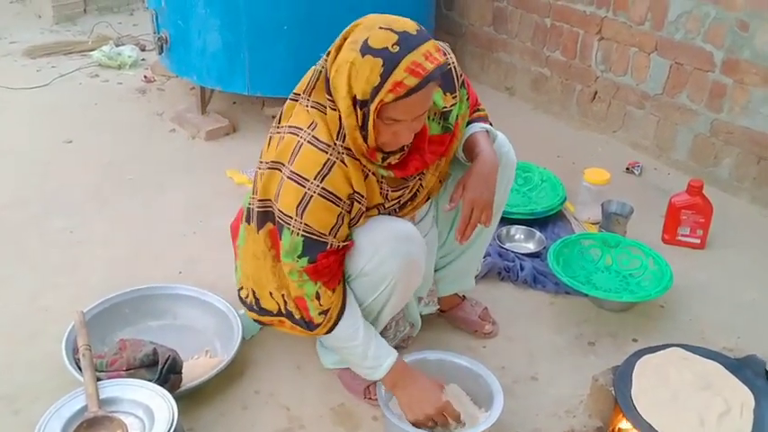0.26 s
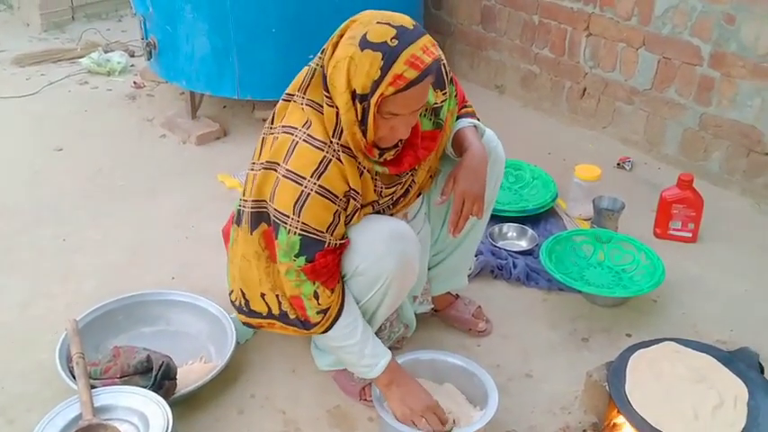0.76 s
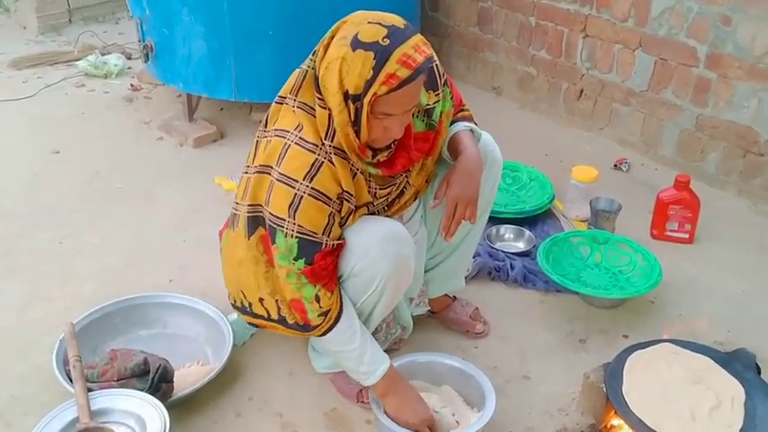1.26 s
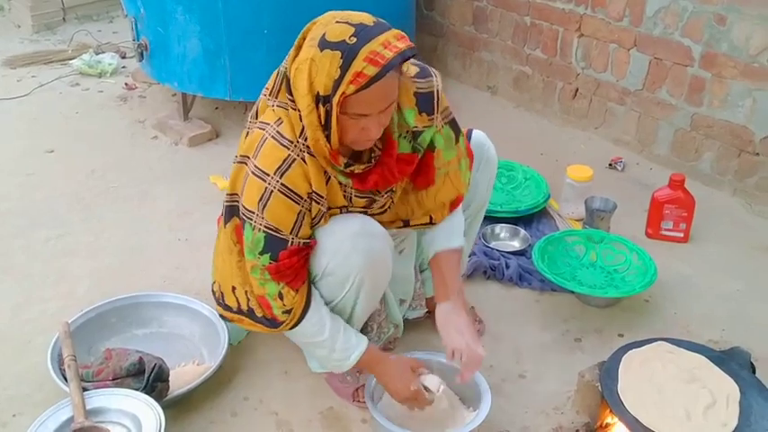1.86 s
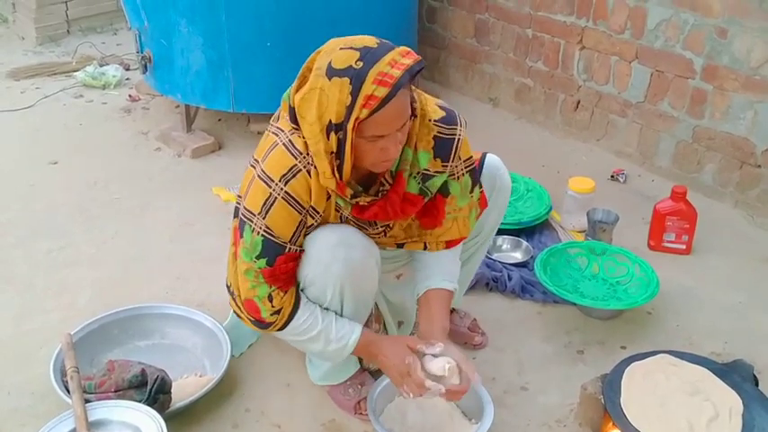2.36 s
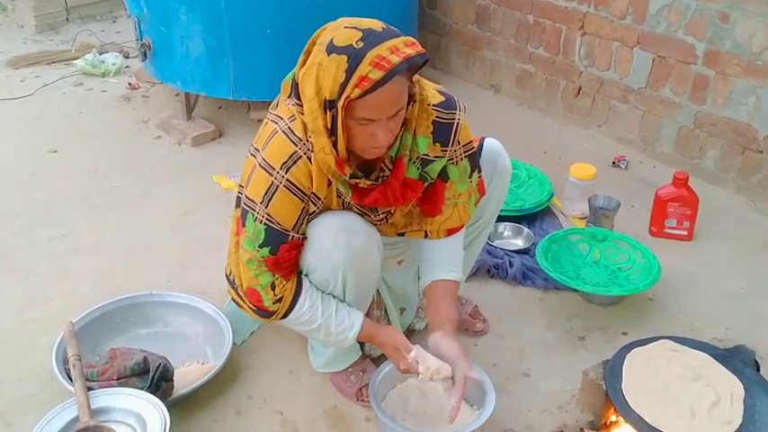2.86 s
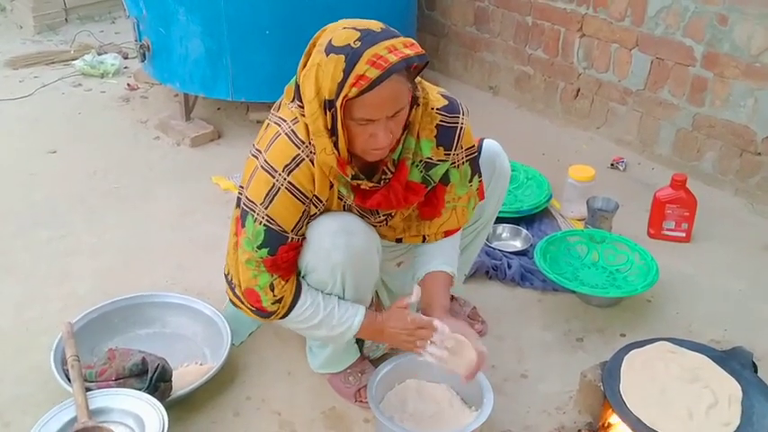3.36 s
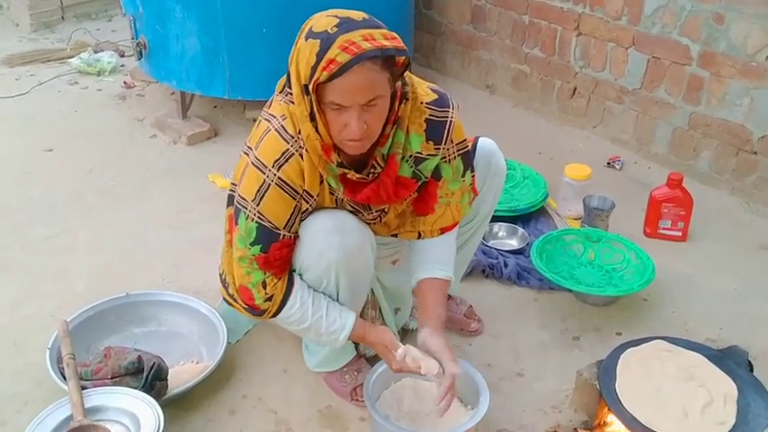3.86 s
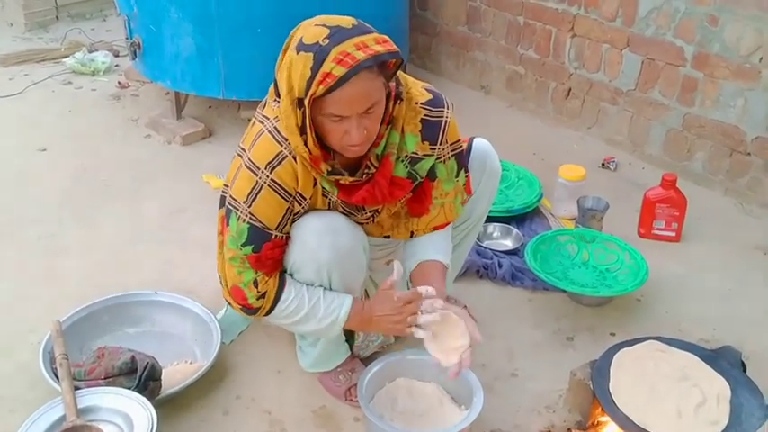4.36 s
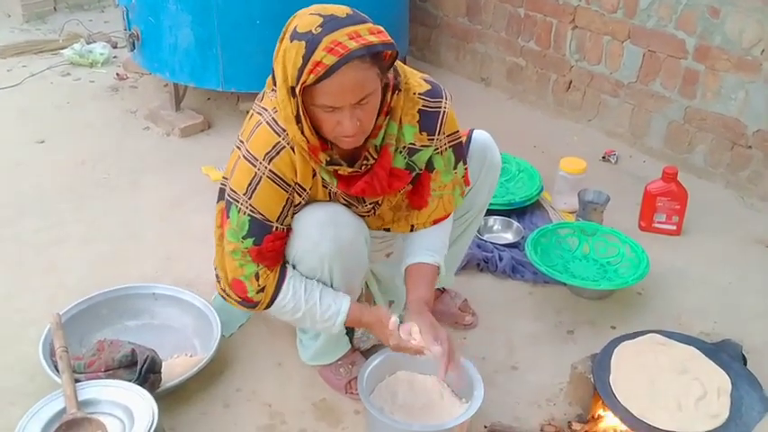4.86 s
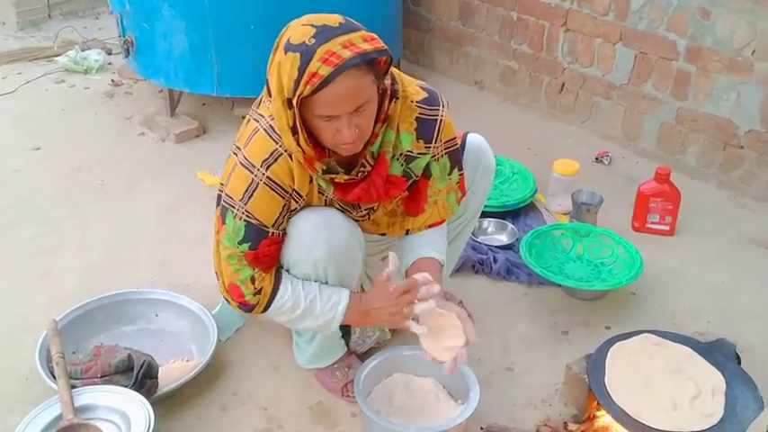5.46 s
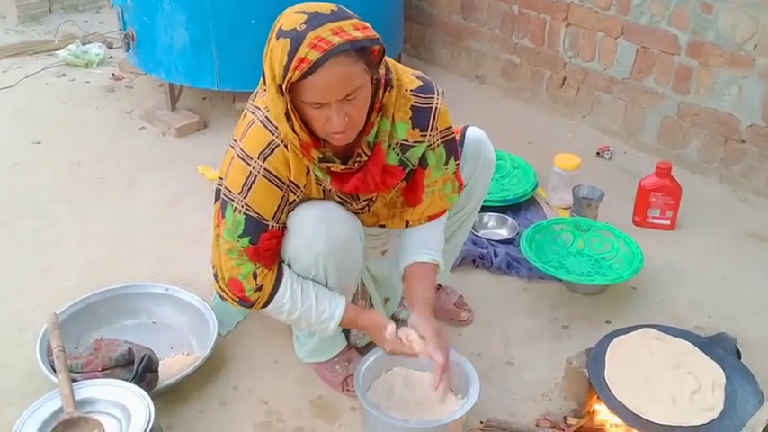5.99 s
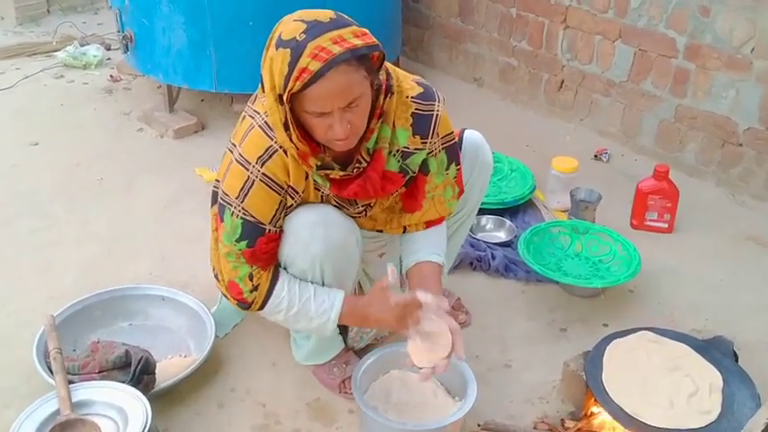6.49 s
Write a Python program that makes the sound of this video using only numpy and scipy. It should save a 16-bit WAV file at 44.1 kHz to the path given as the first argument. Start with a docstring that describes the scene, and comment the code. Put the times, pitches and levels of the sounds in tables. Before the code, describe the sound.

A wood fire snaps close by, with slow palm slaps on dough, one sharp pop and a distant cawing crow.

```python
"""A wood fire snaps close by as a crow caws five times beyond a brick-walled village yard.
The caw is a syrinx tone shaken by a rattle. Dough slapped between two hands rings the cupped air.
Splitting fibres make the snaps; one sharp fire pop sets the microphone ringing low.
A small bird whistles upward, bangles tinkle and far birds pipe over a low background hum.
Walls echo; a phone microphone colours it all."""
import sys
import numpy as np
from scipy import signal
from scipy.fft import rfft, irfft
from scipy.io import wavfile
from scipy.ndimage import uniform_filter1d

SR = 44100
rng = np.random.default_rng(int(sys.argv[2]) if len(sys.argv) > 2 else 0)


def transcribe(signal):
    """Save signal, clipped to [-1, 1], as a 16-bit WAV file at the path in sys.argv[1]."""
    frames = np.atleast_2d(signal).T
    limited = np.clip(frames, -1, 1)
    pcm = np.round(limited * 32767).astype(np.int16)
    wavfile.write(sys.argv[1], SR, pcm)


N = 296793
SHORT_S, LONG_S = np.arange(1024) / SR, np.arange(4096) / SR  # time axes of brief sounds


def caw(length_s, level_db, top_hz, crest, rattle_hz, hoarse):
    """Syrinx tone, pitch and strength shaken by a rattle; hoarseness makes both unsteady."""
    # (frequency [ratio to strongest partial], level [dB])
    partials = [(.5, -17), (.75, -15), (1, 0), (1.25, -20), (2.75, -33), (3, -33)]
    ends_db, sag = -16, .13  # level and pitch drop at zero effort
    t = np.arange(0, length_s, 1 / SR)
    effort = np.sin(np.pi * np.interp(t / length_s, [0, crest, 1], [0, .5, 1])) ** .4
    hz = top_hz * (1 - sag * (1 - effort))
    rattle_rad = 2 * np.pi * np.cumsum(rattle_hz * (1 + .15 * hoarse * wobble(len(t), span=500))) / SR
    jitter = .11 * hoarse * wobble(len(t), span=50)
    cycles = np.cumsum(hz * (1 + .06 * np.sin(rattle_rad) + jitter)) / SR
    beats = (1 + .15 * np.cos(rattle_rad - .8)) * amp(3.5 * hoarse * wobble(len(t), span=80))
    voice = sum(amp(db) * np.cos(2 * np.pi * k * cycles) for k, db in partials)
    envelope = amp(level_db + ends_db * (1 - effort)) * signal.windows.tukey(len(t), .05)
    return envelope * unit_rms(voice * beats)


def crow(echo_s):
    """Five caws and their echo off a wall."""
    # (start [s], length [s], level [dB], top of strongest partial [Hz], effort crest [share of length],
    #  rattle [Hz], hoarseness [0-1])
    caws = [(.27, .305, -48.5, 1760, .62, 77, .37), (1.06, .33, -48, 1780, .6, 78, .35),
            (1.855, .26, -48, 1770, .42, 76, .5), (2.24, .27, -49.5, 1780, .55, 75, .37),
            (3.39, .33, -50, 1800, .68, 74, .62)]
    out = np.zeros(N)
    for start_s, *call in caws:
        add(out, start_s, caw(*call))
    add(out, echo_s, amp(-13) * out)
    return out


def slap(cup, thud_db, clap_db, crack_db, smack_db, far_db):
    """Palm push rings the thud, uneven fingers the clap and crack; wet dough smacks; walls answer."""
    # modes (frequency [Hz], level [dB], t60 [s])
    cupped_air = [(190, -6, .035), (315, 0, .027), (410, 1, .022), (580, -9, .012)]
    palm_on_dough = [(760, -1, .015), (990, 0, .018), (1310, -2, .015)]
    fingers_on_dough = [(1350, -2, .012), (1650, 1, .012), (2150, 0, .01), (2550, -10, .008)]
    # ground and near wall (delay [s], level [dB])
    near_echoes = [(.0032, -2), (.0098, -4), (.021, -16), (.032, -18)]
    # houses across the lane (delay [s], level [dB])
    far_echoes = [(.06, 0), (.0695, -1), (.08, -5), (.101, -4), (.127, -9)]
    lead_s = .0015  # fingertips land before the palm
    push = SHORT_S * np.exp(-SHORT_S / .0003)
    fingers = rng.standard_normal(len(SHORT_S)) * push
    tips = rng.standard_normal(len(SHORT_S)) * SHORT_S * np.exp(-SHORT_S / .002)
    thud = struck(push, np.multiply(cupped_air, [cup, 1, 1]), thud_db)
    clap = struck(fingers, palm_on_dough, clap_db)
    crack = struck(tips, fingers_on_dough, crack_db)
    smack = hiss([(2000, -12), (4000, 0), (9000, -4), (15000, -8)], rise_s=.0015, fade_s=.004)
    bright = clap + amp(smack_db) * smack
    dull = filtered(thud + .2 * clap, 600, "low")  # distance and brick keep the bass
    out = np.zeros(SR // 4)
    add(out, 0, crack)
    add(out, lead_s, .45 * thud + bright)
    for delay_s, db in near_echoes:
        add(out, lead_s + delay_s, amp(db) * (thud + .45 * bright + .6 * crack))
    for delay_s, db in far_echoes:
        add(out, lead_s + delay_s, amp(db + far_db) * dull)
    return out


def dough():
    """Dough slapped from palm to palm."""
    # (time [s], cupped-air pitch [ratio], thud [dB], clap [dB], crack [dB], smack [dB], far walls [dB])
    slaps = [(2.0745, .85, -37, -36, -40, -55, -20), (2.9718, .95, -14.5, -24, -22, -43, -23),
             (3.9885, 1.1, -14, -19, -21, -28, -23), (5.06, 1.08, -14, -11, -22, -29, -16),
             (6.1619, 1.05, -7.5, -14, -24, -26, -17), (6.4615, 1, -60, -50, -46, -64, -20)]
    out = np.zeros(N)
    for start_s, *blow in slaps:
        add(out, start_s, slap(*blow))
    return out


def snap(level_db, body_db, edge_db):
    """Noise burst from splitting fibres; the bass lasts longest."""
    # main, two body and edge bands (from [Hz], to [Hz], gain [dB], fade [s])
    bands = [(7000, 11000, -.5, .0015), (300, 2800, 12, .0022), (2800, 6000, 11.5, .0015),
             (12000, 17000, 8.5, .0017)]
    noise = rng.standard_normal(len(SHORT_S)) * (1 - np.exp(-SHORT_S / .0003))
    levels_db = level_db + np.array([0, body_db, body_db, edge_db])
    return sum(peaked(filtered(noise * np.exp(-SHORT_S / fade_s), [low_hz, high_hz], "band"), db + gain_db)
               for db, (low_hz, high_hz, gain_db, fade_s) in zip(levels_db, bands))


def fire():
    """Burning wood: loud snaps, and faint ones after random waits."""
    # (time [s], level at 7-11 kHz [dB], relative body under 6 kHz [dB], relative edge at 14 kHz [dB])
    snaps = [(0.0462, -37, -18, -7), (0.2897, -46, -14, -12), (0.5166, -32, -16, -16),
             (0.9042, -41, -10, -7), (1.025, -49, -19, -12), (1.1462, -28, -9, -16), (1.4819, -38, -9, -9),
             (2.0761, -35, -11, -7), (2.2791, -39, -18, -13), (2.609, -31, -20, -18),
             (2.7281, -39, -20, -9), (2.7625, -38, -17, -8), (2.797, -39, -23, -11), (2.8678, -47, -5, -15),
             (3.1402, -41, -22, -10), (3.2065, -32, -12, -9), (3.2938, -40, -14, -8),
             (3.463, -45, -21, -13), (3.5632, -40, -20, -17), (3.7418, -40, -13, -4),
             (4.2117, -36, -24, -11), (4.292, -35, -11, -10), (4.6557, -42, -23, -15),
             (4.6807, -39, -23, -16), (4.7076, -48, -13, -12), (4.763, -30, -15, -14),
             (4.785, -34, -13, -11), (4.8538, -37, -18, -12), (5.41, -36, -24, -14), (5.658, -40, -20, -13),
             (5.8475, -39, -20, -15), (6.6068, -31, -5, -9)]
    faint_per_s = 2.2
    waits, sizes = rng.exponential(1, (40, 2)).T
    faint = [(s, -55 + 1.8 * size, -13, -10) for s, size in zip(np.cumsum(waits) / faint_per_s, sizes)]
    out = np.zeros(N)
    for start_s, *levels_db in snaps + faint:
        add(out, start_s, snap(*levels_db))
    return out


def fire_pop(start_s=4.5937, level_db=-4, suction_s=.00072, mic_ring_hz=150, mic_ring_t60_s=.03):
    """A sharp close fire pop with a spray of hiss; it sets the microphone ringing low."""
    dip = -np.sin(np.pi * np.clip(LONG_S / suction_s, 0, 1)) ** 2
    t = np.maximum(LONG_S - suction_s, 0)
    mic_ring = amp(-60 * t / mic_ring_t60_s) * np.cos(2 * np.pi * mic_ring_hz * t)
    rise = (1 - np.exp(-t / .00012)) * (.55 * np.exp(-t / .0006) + .45 * mic_ring)
    ripple = .4 * np.exp(-t / .0004) * np.sin(2 * np.pi * 3100 * t)
    spray = amp(-28) * hiss([(1500, -12), (7000, -4), (14000, 0)], rise_s=.002, fade_s=.012)
    out = np.zeros(N)
    add(out, start_s, amp(level_db) * (dip + rise + ripple + spray))
    return out


def small_bird(echo_s, length_s=.125, from_hz=2800, to_hz=5450, loudest_hz=4450):
    """Rising near-sine whistles, each repeated by a wall."""
    # (time [s], direct [dB], echo [dB])
    whistles = [(.576, -70, -67), (1.8, -76, -70), (2.778, -70, -70), (4.158, -70, -73), (5.42, -69, -71),
                (6.322, -69, -75)]
    out, t = np.zeros(N), np.arange(0, length_s, 1 / SR)
    hz = from_hz + (to_hz - from_hz) * (t / length_s) ** .85
    arch_db = -3.8 * ((hz - loudest_hz) / 1000) ** 2
    sweep = np.sin(2 * np.pi * np.cumsum(hz) / SR) * signal.windows.tukey(len(t), .2)
    for start_s, direct_db, echo_db in whistles:
        tone = sweep * amp(arch_db + 2.5 * wobble(len(t), span=150))
        add(out, start_s, amp(direct_db) * tone)
        add(out, start_s + echo_s, amp(echo_db) * tone)
    return out


def bangles(shake_s=1.39, spread_s=.035, shake_db=-55):
    """Single touches ring briefly, sliding down a little; a shaken stack rings its high modes."""
    # clearest touches (time [s], level [dB], ring [Hz])
    tinkles = [(3.7125, -60, 9610), (3.8242, -59, 9190), (4.0866, -58, 9130), (4.1295, -59, 9620),
               (4.3345, -57, 9600), (4.3675, -57, 10000), (4.4628, -58, 9890), (4.5007, -56, 9820),
               (4.5321, -58, 10500), (4.8194, -58, 10500)]
    # (frequency [Hz], level [dB], t60 [s])
    stack_modes = [(13300, -8, .05), (13800, -3, .08), (14450, 0, .03)]
    faint = [(rng.uniform(3.3, 5.05), -62, rng.uniform(9100, 10600)) for _ in range(12)]
    slide_s = LONG_S + .0002 * (1 - np.exp(-LONG_S / .006))
    envelope = amp(-60 * LONG_S / .04) * (1 - np.exp(-LONG_S / .003))
    out = np.zeros(N)
    for start_s, db, hz in tinkles + faint:
        add(out, start_s, amp(db) * envelope * np.sin(2 * np.pi * hz * slide_s))
    stack = ring(stack_modes) * (1 - np.exp(-LONG_S / .001))
    for offset in np.sort(rng.standard_normal(7)):
        jingle = stack * wobble(len(LONG_S), span=40)
        add(out, shake_s + spread_s * offset, amp(shake_db - 3 * offset ** 2) * jingle)
    return out


def far_birds():
    """Pipes and clucks: short wavering notes."""
    # (time [s], length [s], pitch [Hz], level [dB])
    notes = [(.72, .09, 2340, -66), (.875, .12, 2280, -64), (1.298, .014, 1400, -42),
             (1.62, .18, 1500, -64), (2.644, .02, 1560, -56), (2.79, .02, 1560, -56),
             (2.93, .012, 1630, -56), (3.21, .07, 2370, -65), (4.338, .015, 1400, -58),
             (5.69, .1, 1390, -60), (5.82, .06, 1390, -64), (5.95, .08, 1350, -65), (6.1, .06, 780, -62),
             (6.25, .08, 1400, -62), (6.62, .1, 1350, -60)]
    out = np.zeros(N)
    for start_s, length_s, hz, db in notes:
        size = round(length_s * SR)
        cycles = np.cumsum(hz * (1 + .012 * wobble(size, span=120))) / SR
        add(out, start_s, amp(db) * np.sin(2 * np.pi * cycles) * signal.windows.tukey(size, .6))
    return out


def background_hum(rms_db=-55):
    """Steady low hum with faint hiss, band-limited near 15.5 kHz; the spectrum drifts slightly."""
    # hum, hiss and band limit (frequency [Hz], spectral density [dB])
    spectrum = [(25, -32), (45, -27), (100, 1), (170, 3), (270, 0), (420, -5), (650, -13), (900, -12),
                (1800, -12.5), (2600, -17.5), (3300, -24), (4500, -28), (6000, -29), (15400, -28.5),
                (15650, -90)]
    frames, hz = N // 256 + 5, np.fft.rfftfreq(1024, 1 / SR)[:, None]
    real, imag, patches = rng.standard_normal((frames, 513, 3)).T
    patches = unit_rms(uniform_filter1d(uniform_filter1d(patches, 8, 0), 10, 1))
    patch_db = 2.2 * patches / (1 + hz / 3500)
    swell_db = 1.8 * unit_rms(wobble(frames, span=14)) / (1 + hz / 400)
    spectra = (real + 1j * imag) * amp(curve_db(spectrum, hz) + patch_db + swell_db)
    return amp(rms_db) * unit_rms(signal.istft(spectra, nperseg=1024, noverlap=768)[1][:N])


def yard(x, t60_s, delay_s):
    """Wall reverberation: sparse dying reflections of random sign."""
    at = np.arange(1000) * 21 + rng.integers(0, 21, 1000)
    taps = np.zeros(SR)
    taps[at + round(delay_s * SR)] = rng.choice([-1., 1.], 1000) * amp(-60 * at / SR / t60_s)
    return signal.oaconvolve(x, taps / np.linalg.norm(taps))[:N]


def ring(modes):
    """Dying modes (frequency [Hz], level [dB], t60 [s])."""
    return sum(amp(db - 60 * LONG_S / t60_s) * np.sin(2 * np.pi * hz * LONG_S) for hz, db, t60_s in modes)


def struck(blow, modes, peak_db):
    """Modes rung by a blow, low bass cut."""
    rung = signal.oaconvolve(blow, ring(modes))[:len(LONG_S)]
    return peaked(filtered(rung, 200, "high"), peak_db)


def hiss(spectrum, rise_s, fade_s):
    """Noise burst with a spectrum (frequency [Hz], level [dB])."""
    gain = amp(curve_db(spectrum, np.fft.rfftfreq(len(LONG_S), 1 / SR)))
    noise = unit_rms(irfft(rfft(rng.standard_normal(len(LONG_S))) * gain))
    return noise * (1 - np.exp(-LONG_S / rise_s)) * np.exp(-LONG_S / fade_s)


def wobble(size, span):
    """Random drift, rms about 1, smooth over span samples."""
    noise = rng.standard_normal(SR // 2)
    return unit_rms(uniform_filter1d(uniform_filter1d(noise, span), span))[:size]


def amp(db):
    return 10 ** (np.asarray(db) / 20)


def unit_rms(x):
    return x / np.sqrt(np.mean(x ** 2) + 1e-20)


def peaked(x, db):
    return amp(db) * x / abs(x).max()


def filtered(x, hz, kind):
    return signal.lfilter(*signal.butter(2, hz, kind, fs=SR), x)


def curve_db(points, hz):
    points_hz, points_db = np.transpose(points)
    return np.interp(np.log(hz + 1), np.log(points_hz + 1), points_db)


def add(mix, start_s, sound):
    part = mix[round(start_s * SR):][:len(sound)]
    part += sound[:len(part)]


def scene():
    """Far birds and near sounds with their yard reverberation, over the hum; mono."""
    wall_echo_s = .076
    caws, snaps, pop, slaps = crow(wall_echo_s), fire(), fire_pop(), dough()
    far = caws + amp(-6) * yard(caws, t60_s=.25, delay_s=.004) + far_birds()
    whistles = small_bird(wall_echo_s)
    far += whistles + amp(4) * yard(whistles, t60_s=.3, delay_s=.004)
    near = snaps + amp(-11) * yard(snaps, t60_s=.08, delay_s=.002)
    near += pop + amp(-24) * yard(pop, t60_s=.1, delay_s=.006)
    near += slaps + amp(-13) * yard(slaps, t60_s=.11, delay_s=.002)
    near += amp(-22) * yard(filtered(slaps, 600, "low"), t60_s=.45, delay_s=.03)
    return (far + near + bangles() + background_hum())[None]


def record(dry, limit_hz=16750):
    """Phone microphone: minimum-phase colour, then a band limit."""
    # (frequency [Hz], gain [dB])
    response = [(20, -12), (120, 0), (5000, 0), (6300, -6), (7600, 6), (9000, 5), (10500, -2), (13700, 0),
                (15200, 11), (15500, -10), (16500, -14)]
    log_gain = np.log(amp(curve_db(response, abs(np.fft.fftfreq(8192, 1 / SR)))))
    taps = np.fft.ifft(np.exp(np.conj(signal.hilbert(log_gain)))).real[:len(LONG_S)]
    coloured = signal.oaconvolve(dry, taps[None])[:, :N]
    lowpass = signal.firwin(511, limit_hz, window=("kaiser", 9), fs=SR)
    return signal.oaconvolve(coloured, lowpass[None], "same")


dry = scene()
out = record(dry)
transcribe(out)
```